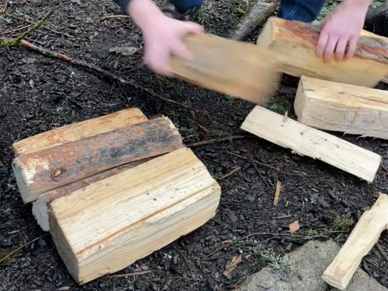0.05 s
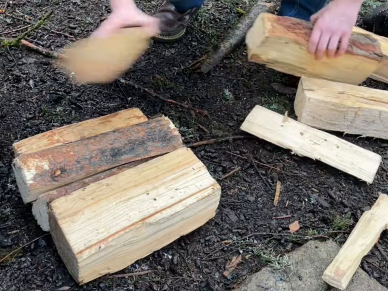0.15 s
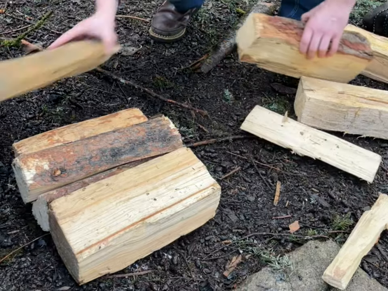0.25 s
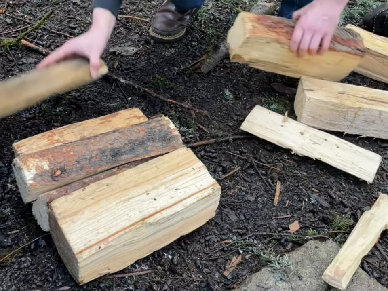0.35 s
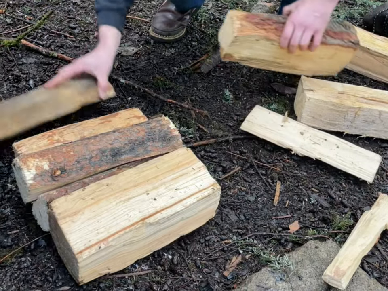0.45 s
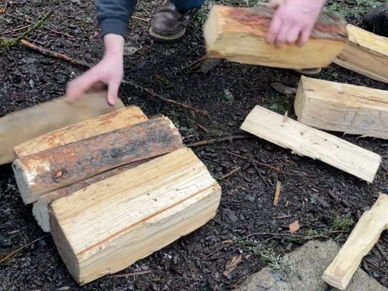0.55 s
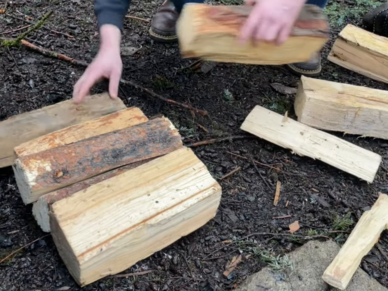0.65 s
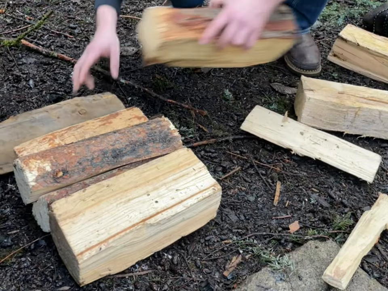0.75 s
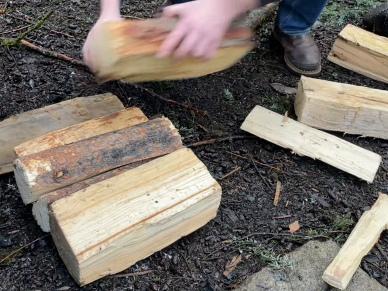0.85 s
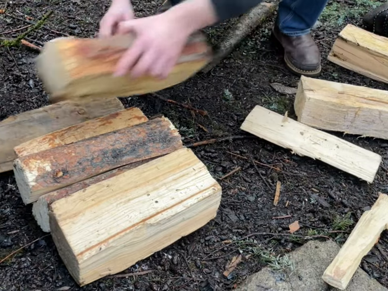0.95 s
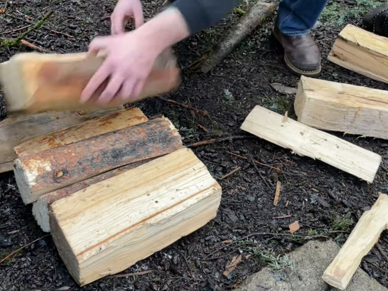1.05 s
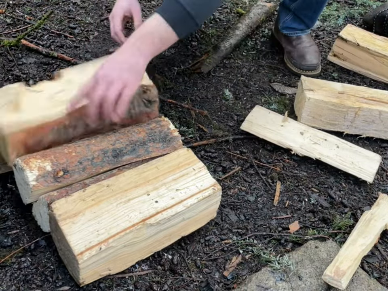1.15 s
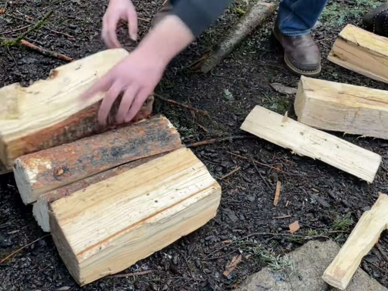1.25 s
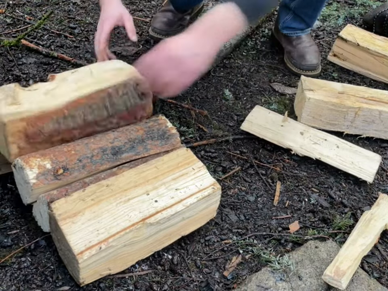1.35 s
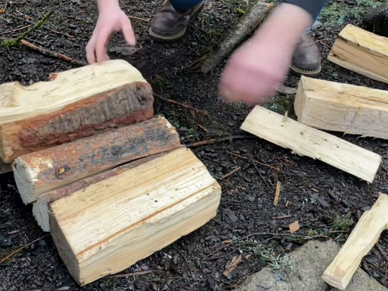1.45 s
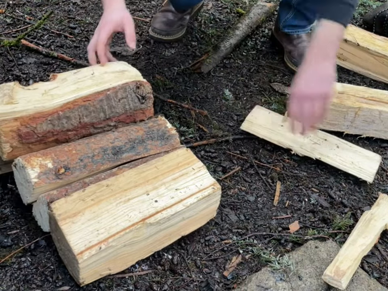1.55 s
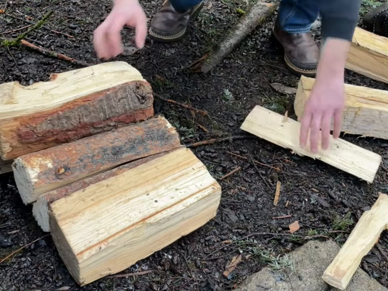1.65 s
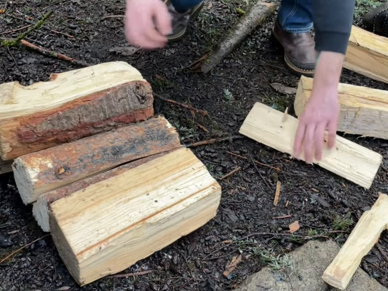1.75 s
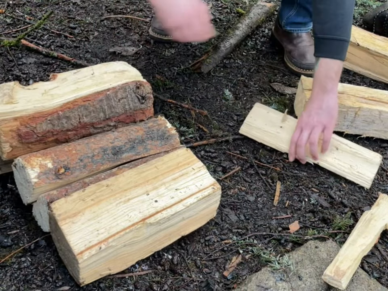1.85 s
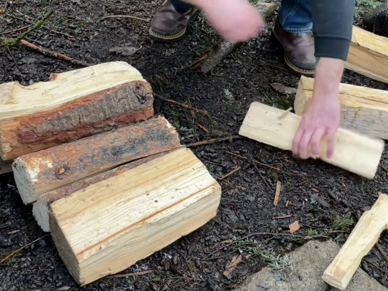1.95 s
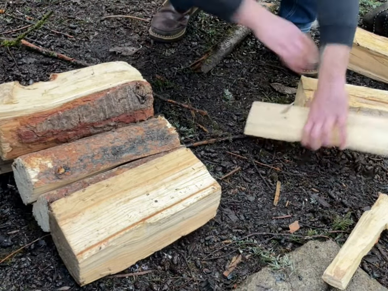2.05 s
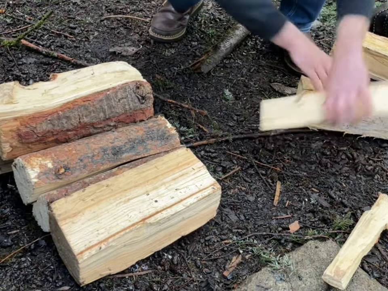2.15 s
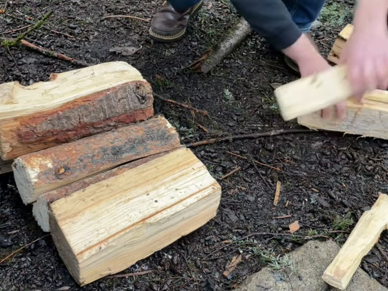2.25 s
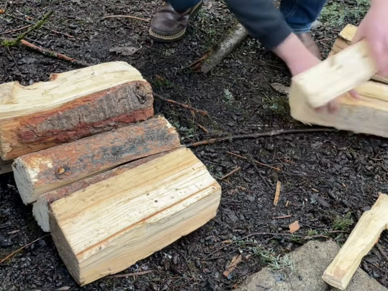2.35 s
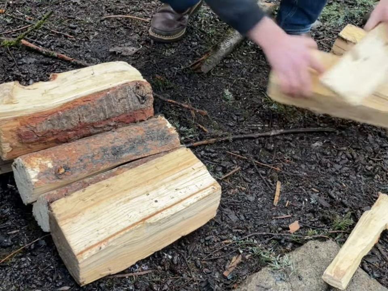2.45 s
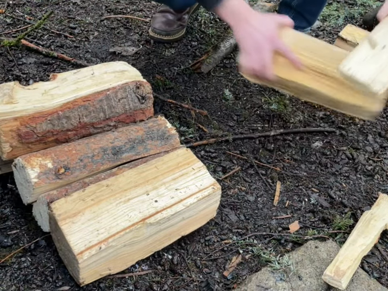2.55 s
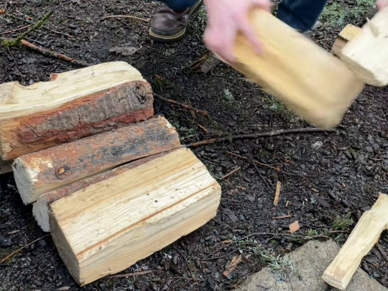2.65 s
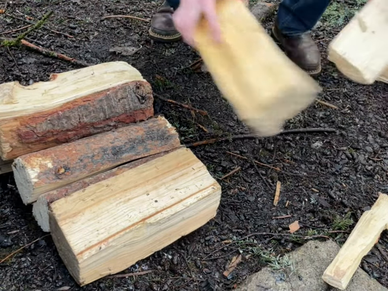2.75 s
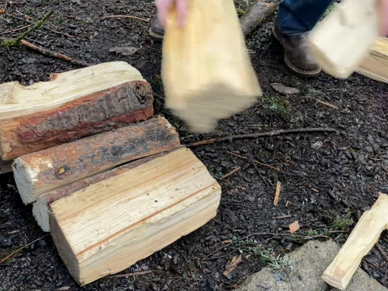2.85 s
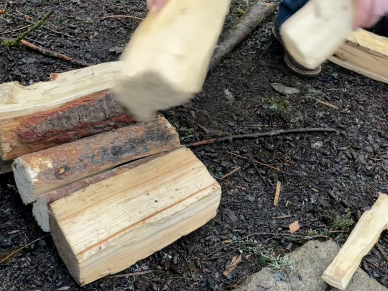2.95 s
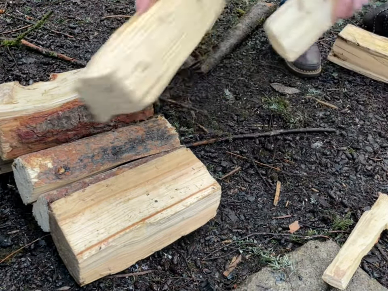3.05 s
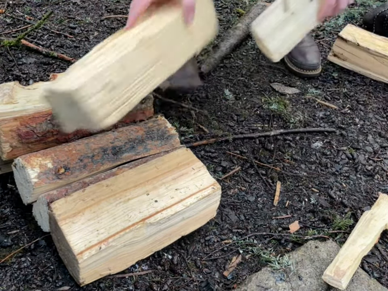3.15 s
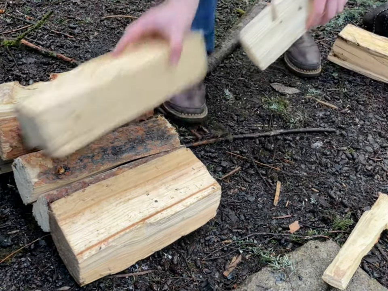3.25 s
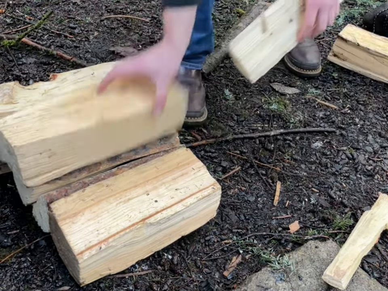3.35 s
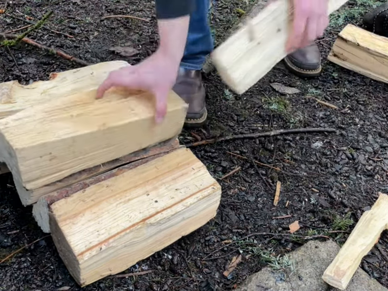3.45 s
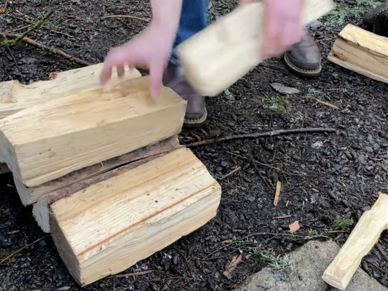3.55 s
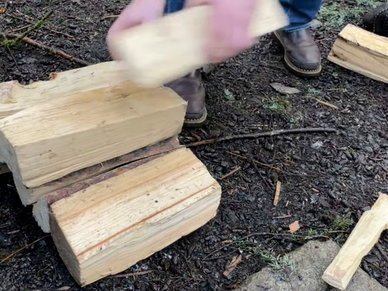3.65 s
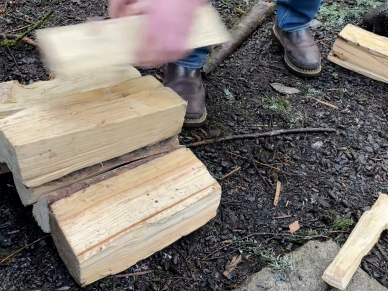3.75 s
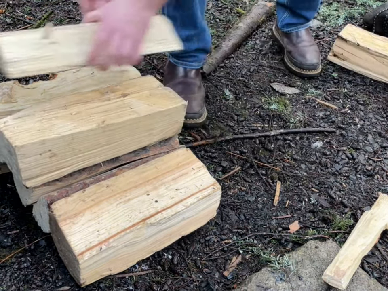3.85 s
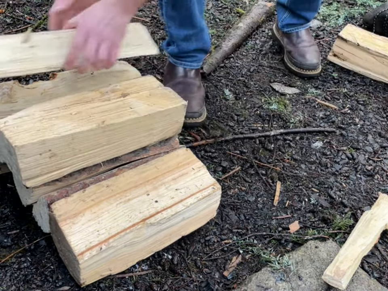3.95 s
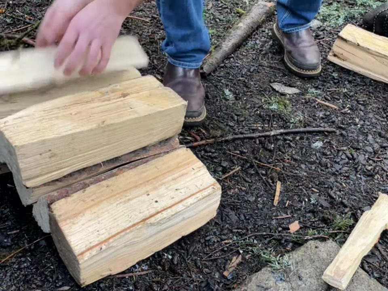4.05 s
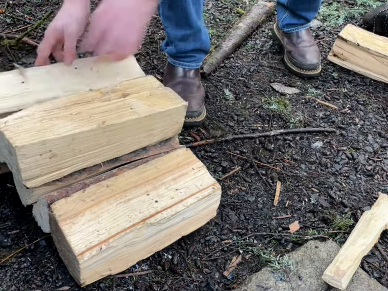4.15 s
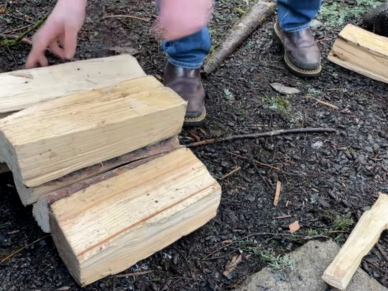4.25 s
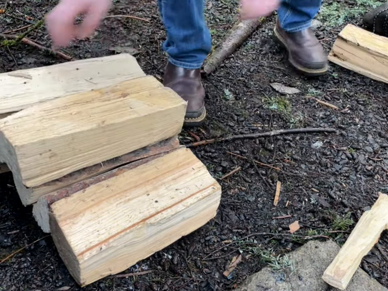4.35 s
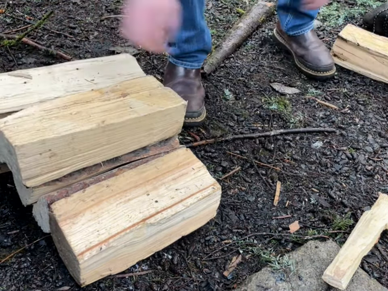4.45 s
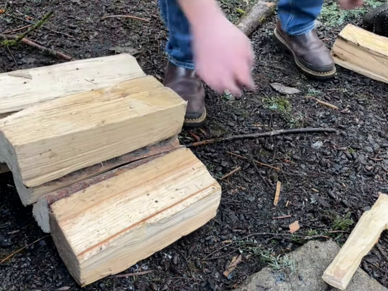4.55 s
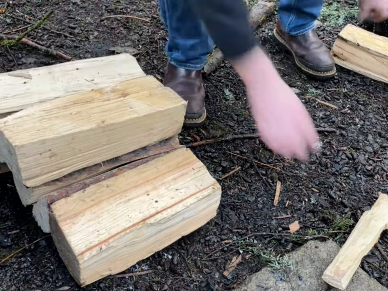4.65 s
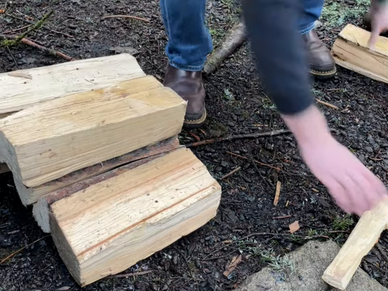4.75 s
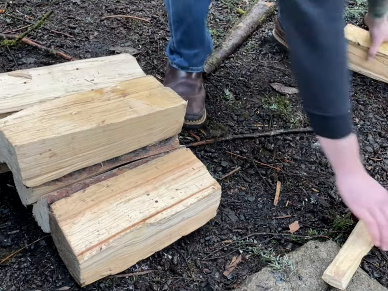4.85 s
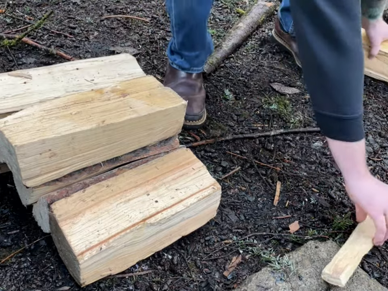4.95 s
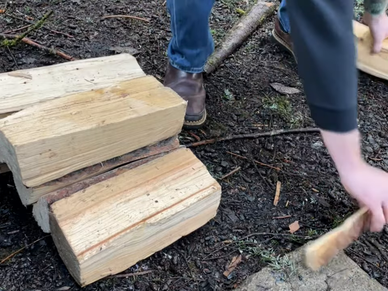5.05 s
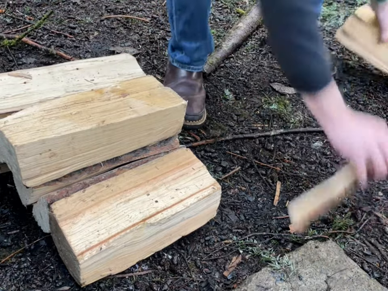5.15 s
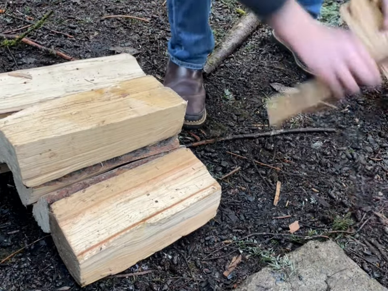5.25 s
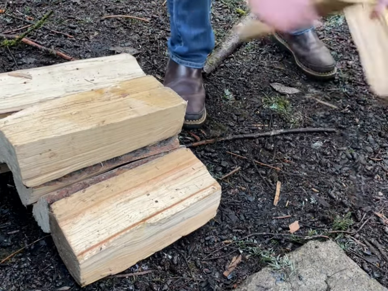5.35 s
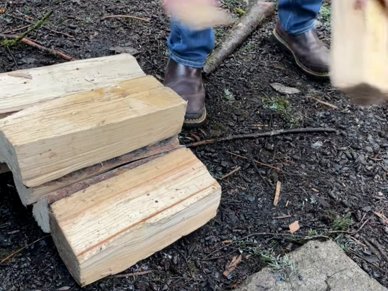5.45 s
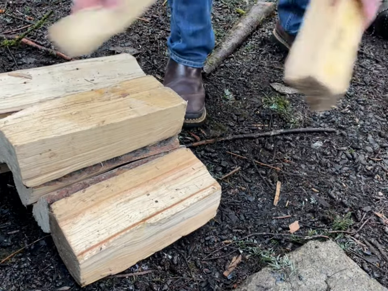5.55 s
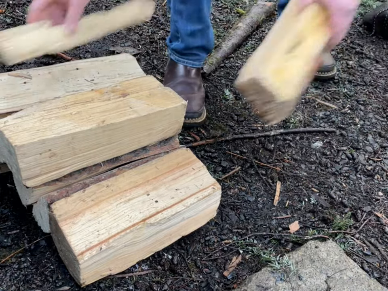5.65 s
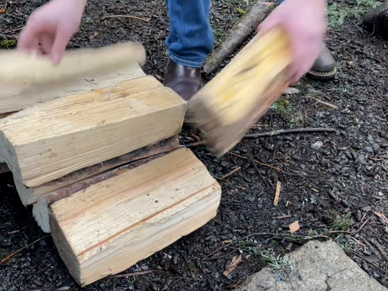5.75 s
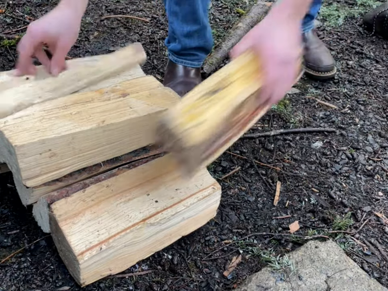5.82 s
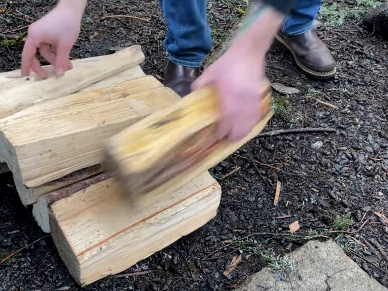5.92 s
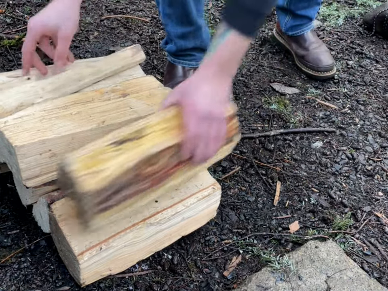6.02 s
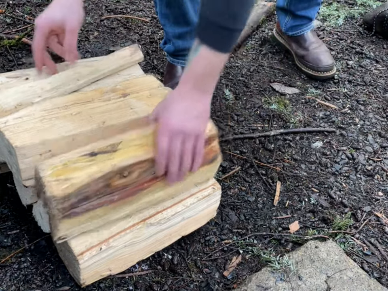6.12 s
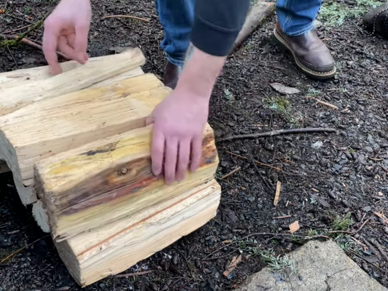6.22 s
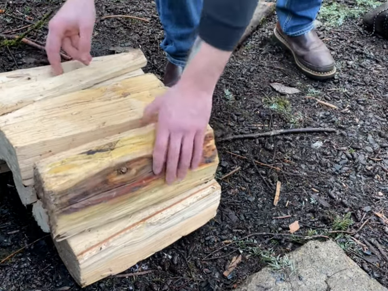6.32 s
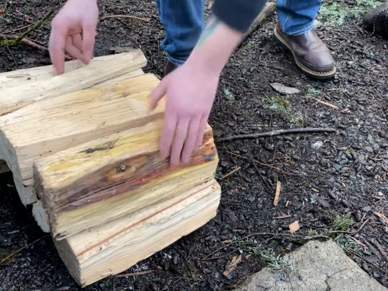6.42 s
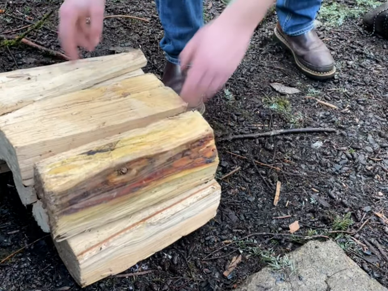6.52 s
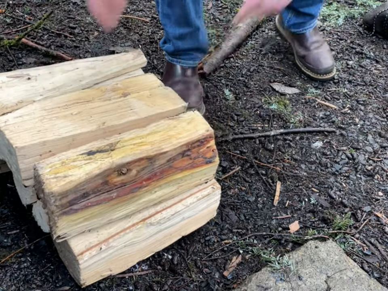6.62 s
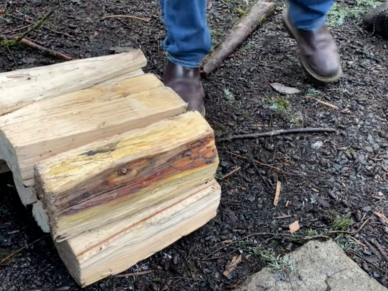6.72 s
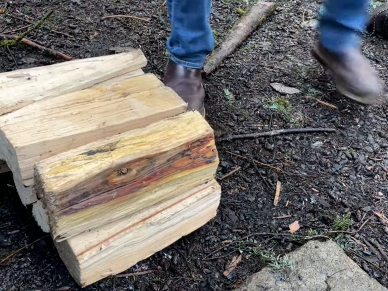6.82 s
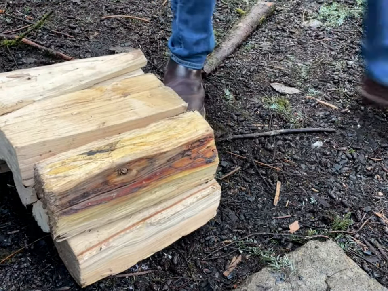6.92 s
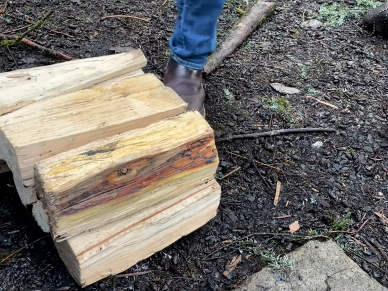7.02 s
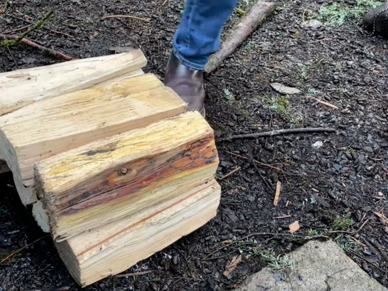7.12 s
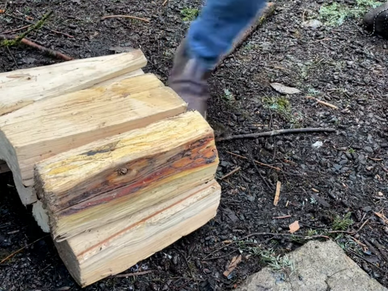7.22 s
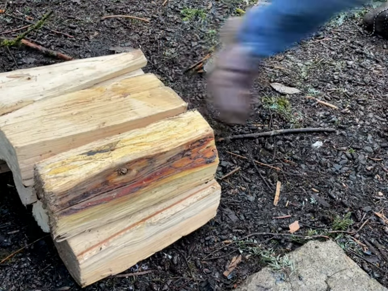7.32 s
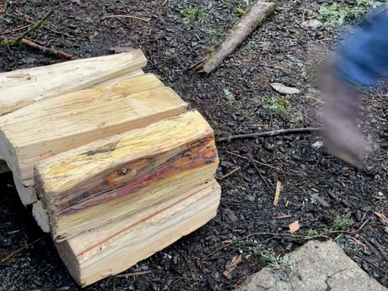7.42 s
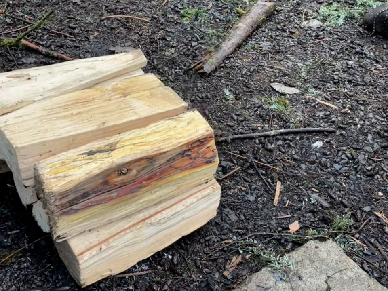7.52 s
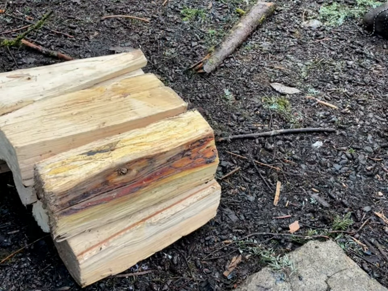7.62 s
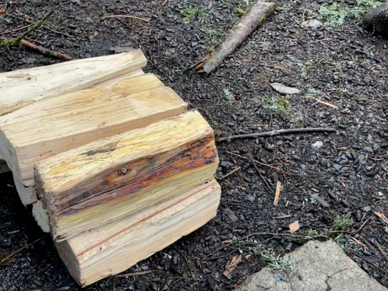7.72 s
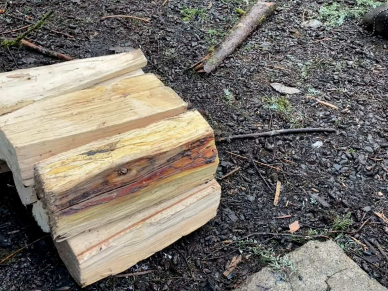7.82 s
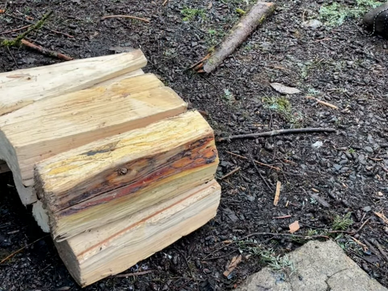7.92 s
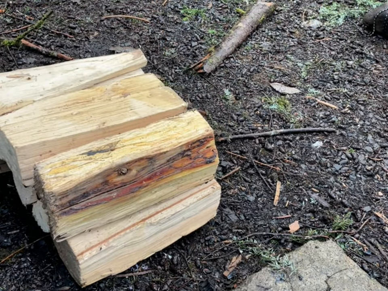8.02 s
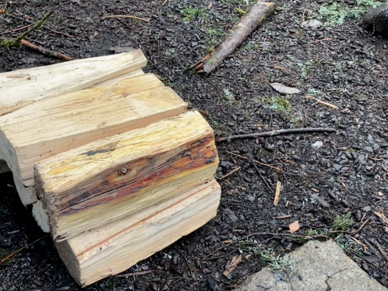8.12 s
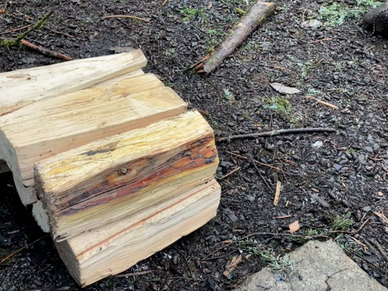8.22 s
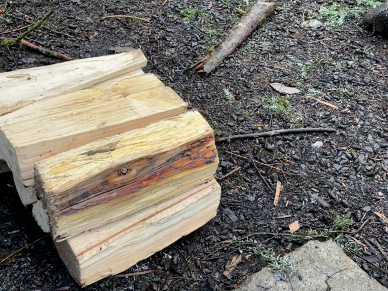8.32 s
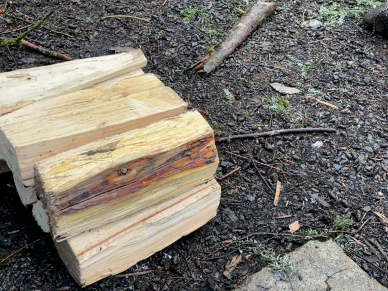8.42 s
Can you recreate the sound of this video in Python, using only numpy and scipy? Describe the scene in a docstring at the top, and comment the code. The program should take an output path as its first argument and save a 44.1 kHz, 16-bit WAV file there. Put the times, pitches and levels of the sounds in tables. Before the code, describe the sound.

Firewood is piled at an outdoor campsite: short, damped wooden knocks, each piece rocking as it lands, some bright and hard, others duller. Tiny twig ticks, rubs and litter rustles fill the gaps. Stacking ends, then faint heel thumps and crisp crackles move off. Near, dry, mono sound with little echo and soft steady air.

```python
"""Stacking split firewood in a forest

At a campsite, close to the microphone, split logs are stacked on damp soil. Each piece lands on edge and
face: damped wood modes ring, noise cracks, two low pile modes thud. Showers of clicks are crushed bark
and litter. Noise ticks are twigs, low damped tones are boot heels midway and near the end, and narrow
noise swells are rubs. Behind lie a faint scattered tail and a soft, even outdoor rush with a low drone."""
import sys
import numpy as np
from scipy import signal
from scipy.fft import rfft, irfft
from scipy.io import wavfile

SR = 44100
rng = np.random.default_rng(int(sys.argv[2]) if len(sys.argv) > 2 else 0)


def inscribe(sig):
    """Save sig as 16-bit PCM at rate SR to the path in sys.argv[1].

    A 1-D sig is mono; a 2-D sig holds one channel per row.
    Samples are clipped to [-1, 1] before scaling.
    """
    pcm = np.round(np.clip(np.atleast_2d(sig).T, -1, 1) * 32767)
    wavfile.write(sys.argv[1], SR, pcm.astype(np.int16))


N = 374004
BLOW = SR // 3   # samples given to one event
AGE = np.arange(BLOW) / SR   # s since the start of an event

# soft blows of heels on the soil: (t/s, level/dB, f/Hz)
FOOTFALLS = [(3.224, -14, 122), (7.667, -21, 145), (8.166, -22, 121)]
# a hand drags a piece, or a sole rolls over the litter: (middle t/s, half length/s, level/dB, centre f/Hz)
RUSTLES = [(0.188, 0.019, -46.5, 8600), (0.413, .025, -42, 7600), (0.524, .013, -36, 4020),
           (1.063, 0.015, -42, 4220), (1.346, .01, -37.5, 4400), (2.341, 0.028, -48, 6800),
           (3.191, 0.014, -46, 4500), (3.704, 0.016, -53, 9900), (5.001, 0.024, -47.5, 9000),
           (5.781, 0.0045, -38, 4500), (6.062, .018, -47.5, 6000), (6.426, 0.025, -46.5, 6050),
           (7.058, 0.023, -48.5, 8500), (7.155, .05, -47, 2800), (7.721, 0.067, -45.5, 4900),
           (8.299, .06, -43, 5800)]
TICK_T60 = 0.0076   # s, of a snapping twig and of a crumb of litter


def from_db(db):
    """Decibels to gain."""
    return 10 ** (np.asarray(db) / 20)


def rms_one(x):
    """Scale to unit rms."""
    return x / np.sqrt(np.mean(x ** 2) + 1e-20)


def add(track, s, sound):
    """Mix a sound into the track from time s."""
    start = max(round(s * SR), 0)
    track[start:start + len(sound)] += sound[:N - start]


def fade(t60):
    """Exponential decay, down 60 dB after t60 seconds."""
    return np.exp(-np.log(1000) * AGE / t60)


def ring(hz, t60, build_cycles=0.24):
    """One damped mode; it needs part of a cycle to build up, so lows arrive later."""
    build_up = 1 - np.exp(-AGE * hz / build_cycles)
    return np.sin(2 * np.pi * hz * AGE) * fade(t60) * build_up


def soften(x, hz):
    """Two one-pole low-passes: a soft contact spreads the force in time."""
    r = np.exp(-2 * np.pi * hz / SR)
    return signal.lfilter([(1 - r) ** 2], [1, -2 * r, r * r], x + 1e-18)


def band(x, hz, width_hz):
    """A resonance around hz, at unit rms."""
    low = np.sqrt(hz ** 2 + width_hz ** 2 / 4) - width_hz / 2
    high = min(low + width_hz, .45 * SR)
    return rms_one(signal.sosfilt(signal.butter(2, [low, high], "band", fs=SR, output="sos"), x))


def coloured(spectrum, size):
    """Noise with the given spectrum, at unit rms."""
    hz, db = np.transpose(spectrum)
    bins = np.arange(size // 2 + 1) * SR / size
    gain = from_db(np.interp(np.log(bins + 1e-9), np.log(hz), db))
    return rms_one(irfft(rfft(rng.standard_normal(size)) * gain, size))


def swell(half_length):
    """A bell-shaped push that peaks two half lengths after its start."""
    return np.exp(-(AGE / half_length - 2) ** 2)


def knocks(thud_lag=0.0021, face_hardness_hz=1250):
    """Wood on wood: edge and face strike a moment apart, each rings and cracks; the weight shoves the pile."""
    # bending modes of each piece of wood, by name: (f/Hz, level/dB, t60/s while it rings freely)
    log_modes = { "grey": [(550, -13, 0.045), (1142, -9, 0.015), (1542, -1.5, 0.023), (1618, -2.5, 0.038),
                 (1770, -11, 0.028), (2060, -0.5, 0.014), (2242, -22, 0.031), (2620, -2.5, 0.015),
                 (2880, -4, 0.0095), (3015, -10, 0.023), (3240, -18, 0.025), (3600, -9, 0.013),
                 (3790, -18, 0.023), (4100, -7.5, 0.008), (4098, -30, 0.028), (4577, -20, 0.012)],
                 "bottom": [(490, 3.5, 0.014), (540, -3, 0.045), (677, -1, 0.041), (854, -8, 0.021),
                 (1033, -9, 0.072), (1130, -9, 0.05), (1500, -7, 0.027), (1727, -7, 0.03),
                 (1810, -8, 0.042), (2240, -6, 0.028), (2330, -9, 0.028), (2757, -10, 0.023),
                 (2810, -7, 0.03), (2800, -1, 0.02), (3000, -12, 0.023), (3100, -1.5, 0.0096)],
                 "barked": [(210.5, -11.5, 0.17), (348, -9, 0.057), (509, 3.5, 0.022), (577, 4, 0.025),
                 (790, -13.5, 0.065), (904, -8, 0.047), (1026, -14.5, 0.11), (1216, -4.5, 0.022),
                 (1342, -11, 0.035), (1530, -25, 0.21), (1711, -11.5, 0.017), (1990, -23, 0.081),
                 (2200, -17.5, 0.035), (2430, -25, 0.025), (2324, -14, 0.027), (2600, -16, 0.013)],
                 "thick": [(279, -19, 0.06), (448, -16, 0.081), (674, -15, 0.091), (737, -25, 0.05),
                 (895, -7, 0.018), (1162, -15, 0.042), (1298, -2, 0.032), (1530, 5, 0.0041),
                 (1634, -7.5, 0.026), (2280, -18, 0.037), (2540, -14.5, 0.025), (3200, -9, 0.0069),
                 (3170, -6, 0.018), (3680, -13, 0.023), (4115, -30, 0.026), (4020, 0.5, 0.0059),
                 (6220, -11.5, 0.016)], "slat": [(570, -22, 0.013), (756, -22, 0.022), (1750, -5.5, 0.016),
                 (1990, -13, 0.03), (1360, -4, 0.0087), (2400, 3, 0.013), (2610, -4, 0.019),
                 (2620, -9, 0.017), (2730, -11, 0.025), (3140, -4, 0.015), (3312, -22.5, 0.03),
                 (3400, -10, 0.023), (3640, -7, 0.016), (4207, -13, 0.026), (4370, -10, 0.032),
                 (4477, 1.5, 0.0043), (6600, -5, 0.0089)], "stick": [(335, -16, 0.05), (525, -8, 0.045),
                 (660, -20, 0.056), (703, -14, 0.12), (918, -7.5, 0.082), (1020, -18, 0.036),
                 (1210, -18, 0.025), (1260, -21, 0.051), (1340, -15, 0.012), (1800, -5.5, 0.025),
                 (1840, -17, 0.026), (2600, 3.5, 0.018), (2610, -2, 0.043), (2870, -6, 0.017),
                 (3130, -6.5, 0.031), (3400, -7, 0.016)], "knotty": [(323, -9, 0.012), (380.5, -14.5, 0.12),
                 (476, -9, 0.043), (565, 0, 0.025), (787, -6.5, 0.037), (984, -18, 0.092),
                 (1125, -16, 0.063), (1557, -3, 0.035), (1530, -0.5, 0.009), (1876, -21, 0.047),
                 (2120, -26, 0.038), (2040, -17, 0.027), (3060, -5.5, 0.0044), (3200, -23, 0.033),
                 (3470, -15, 0.023), (4000, -34, 0.053)], "rear": [(286, -15.5, 0.041), (474, -13.5, 0.047),
                 (616, -3, 0.015), (723, -0.5, 0.024), (910, -10.5, 0.031), (1030, -16, .03),
                 (1340, -10, .025), (2400, -12, .012)], }
    # a piece rocks as it lands: (t/s, piece that rings, edge force level/dB, edge hardness f/Hz,
    # face force level/dB, face lag/s (negative: face first), thud level/dB)
    contacts = [ (0.5, "grey", -1.5, 16800, -17, -0.0017, -48),
                (0.5546, "bottom", -23.5, 6500, -31, -0.0028, -42),
                (0.5635, "bottom", -12.5, 14000, -29, 0.015, -27),
                (1.0938, "barked", -22.5, 5200, -35, 0.0017, -21),
                (1.1447, "barked", -7, 5200, -6.5, -.0029, -20),
                (1.2016, "barked", -25, 500, -49, 0.0014, -22),
                (1.318, "barked", -26, 800, -40, -0.0062, -30),
                (3.314, "thick", -25, 6700, -12.5, 0.0059, -22),
                (3.3642, "thick", -6.5, 20000, 5.5, .0034, -30),
                (3.373, "thick", -7.5, 1300, -13, .0027, -20), (4.0862, "rear", -8, 4400, -27, 0.013, -17),
                (4.1142, "slat", -10.5, 18000, -28, 0.0011, -39),
                (4.1334, "rear", -21.5, 4200, -24, .0004, -27),
                (4.148, "slat", -21.5, 3800, -27, 0.012, -43),
                (5.7673, "stick", -21, 10000, -36, 0.018, -35),
                (5.8036, "thick", -8.5, 870, -27, -0.0033, -29),
                (5.817, "stick", -13.5, 2100, -20, 0.011, -27),
                (6.1161, "knotty", -18, 16000, -21, .004, -28),
                (6.1263, "knotty", 0.5, 1650, -20, 0.00021, -39),
                (6.133, "knotty", -1.5, 4100, -28, 0.01, -20),
                (6.1554, "knotty", -23, 1900, -34, 0.0093, -26), ]
    out = np.zeros(N)
    bodies = {name: log_body(modes) for name, modes in log_modes.items()}
    # the two low modes of the pile on the soil
    pile_low_hz, pile_high_hz, pile_t60 = 119, 252, 0.021
    thud = ring(pile_low_hz, pile_t60) - ring(pile_high_hz, pile_t60)
    for s, name, edge_db, edge_hz, face_db, face_lag, thud_db in contacts:
        edge = (s, edge_db, edge_hz)
        face = (s + face_lag, face_db, face_hardness_hz)
        for at, force_db, hardness_hz in (edge, face):
            add(out, at, from_db(force_db) * soften(bodies[name], hardness_hz))
            add(out, at, from_db(crack_level(force_db, hardness_hz)) * crack())
        add(out, s + thud_lag, from_db(thud_db) * thud)
    return out


def log_body(modes, settle_s=0.014, settled_db=-4.0):
    """A log rings freely for a moment, then presses into the pile, which mutes it."""
    free = np.zeros(BLOW)
    for k, (hz, db, t60) in enumerate(modes):
        sign = (-1) ** k
        free += sign * from_db(db) * ring(hz, t60)
    settled = 1 - np.exp(-(AGE / settle_s) ** 4)
    return free * from_db(settled_db * settled)


def crack(rise_s=0.00052, dull_hz=5000, bright_t60=0.0093, dull_t60=0.034):
    """The dense high modes of split wood, as noise: the brightest of them die first."""
    # the many high wood modes of a crack: (f/Hz, level/dB per Hz)
    crack_spectrum = [(500, 0), (1500, 0.5), (3300, 0), (5000, -4.5), (6500, -5), (9000, -7),
                      (13000, -14.5), (16000, -19)]
    modes = coloured(crack_spectrum, BLOW)
    dull = soften(modes, dull_hz)
    return (modes * fade(bright_t60) + dull * fade(dull_t60)) * (1 - np.exp(-AGE / rise_s))


def crack_level(force_db, hardness_hz, full_force_db=-21.5, reference_hz=3000,
                db_per_force_db=0.47, db_per_octave=3.5):
    """The crack grows with the force and the hardness of a contact."""
    return full_force_db + db_per_force_db * force_db + db_per_octave * np.log2(hardness_hz / reference_hz)


def crunches(per_s=550, spread_db=4.0, width=0.52, finest_hz=11000):
    """Fibres give way as a shower of tiny clicks, in bands pitched by the size of the splinters."""
    # the sizes of splinters, as pitches: (multiple of the centre f, level/dB)
    splinters = [(.25, -4.5), (.4, -4.5), (.63, -2), (1, -1.5), (1.6, -8.5), (2.5, -7.5)]
    out = np.zeros(N)
    for s, half_length, db, hz in crushings():
        grains = np.zeros(BLOW)
        for multiple, grit_db in splinters:
            sizes = from_db(spread_db * np.minimum(rng.exponential(1, BLOW), 4))
            signed_sizes = sizes * rng.choice([-1, 1], BLOW)
            clicks = signed_sizes * (rng.random(BLOW) < per_s / SR)
            pitch = min(multiple * hz, finest_hz)
            grains += from_db(grit_db) * band(clicks + 1e-18, pitch, width * pitch)
        add(out, s - 2 * half_length, from_db(db) * swell(half_length) * rms_one(grains))
    return out


def crushings():
    """Rustles, landings and heels all crush fibres: (middle t/s, half length/s, level/dB, centre f/Hz)."""
    # a piece lays its weight on the pile: (t/s, crushed bark level/dB, settling litter level/dB)
    landings = [(.563, -35.5, -43.5), (1.145, -34, -43), (3.363, -33.5, -59), (4.134, -41, -51),
                (5.826, -33.5, -52), (6.134, -26.5, -48)]
    # bark is crushed just before the weight arrives; the litter under the pile settles after it
    crush_lead_s, crush_half_s, crush_hz = .011, .009, 4800
    settle_lag_s, settle_half_s, settle_hz = .051, .019, 5800
    # a heel crushes the litter just before it thumps the soil; the level is relative to the thump
    heel_lead_s, heel_half_s, heel_crunch_db, heel_crunch_hz = .004, 0.0071, -21, 4520
    bark = [(s - crush_lead_s, crush_half_s, db, crush_hz) for s, db, _ in landings]
    settling = [(s + settle_lag_s, settle_half_s, db, settle_hz) for s, _, db in landings]
    heels = [(s - heel_lead_s, heel_half_s, db + heel_crunch_db, heel_crunch_hz) for s, db, _ in FOOTFALLS]
    return RUSTLES + bark + settling + heels


def snaps(width_hz=6000):
    """A thin twig or fibre breaks with one bright tick of fading noise."""
    # the loudest twigs and fibres snapping: (t/s, level/dB, centre f/Hz)
    breaks = [(.345, -41, 12000), (.602, -33, 4970), (1.2503, -29, 13500), (1.3418, -20, 4200),
              (1.4692, -38.5, 11000), (2.0955, -39.5, 10000), (3.8843, -38, 7000), (3.954, -33, 4550),
              (4.4655, -35, 3500), (5.009, -39, 9000), (5.2077, -39, 11000), (7.0305, -34, 12000),
              (7.6589, -33.5, 6500), (7.694, -29, 5000), (7.928, -26, 12300), (7.942, -23, 7550),
              (8.312, -26.5, 6500)]
    out = np.zeros(N)
    for s, db, hz in breaks:
        noise = band(rng.standard_normal(BLOW), hz, width_hz)
        add(out, s, from_db(db) * fade(TICK_T60) * noise)
    return out


def footwork(heel_hz=260, heel_t60=0.037, rub_width=0.45):
    """Heels thump the soft ground; gripping surfaces slip with a brief narrow rasp."""
    # short rubs of soles and hands: (middle t/s, half length/s, level/dB, centre f/Hz)
    slips = [(0.18, 0.0087, -46, 9000), (0.687, .012, -41.5, 760), (3.21, 0.015, -34, 460),
             (4.015, .018, -48, 7900), (6.432, .012, -37.5, 1630), (7.126, 0.0076, -41, 1700),
             (7.201, .004, -34.5, 1320), (7.22, 0.0029, -34.5, 1430), (8.159, .009, -35.5, 510)]
    out = np.zeros(N)
    for s, db, hz in FOOTFALLS:
        add(out, s, from_db(db) * soften(ring(hz, heel_t60), heel_hz))
    for s, half_length, db, hz in slips:
        rasp = band(rng.standard_normal(BLOW), hz, rub_width * hz)
        add(out, s - 2 * half_length, from_db(db) * swell(half_length) * rasp)
    return out


def litter(per_s=6, pressed_per_s=35, level_db=-35, pressed_db=6, spread_db=3.5, low_hz=4500):
    """Stray needles and crumbs tick all the while, more often and louder where they are pressed."""
    pressed = pressure()
    breaks = rng.random(N) < (per_s + pressed_per_s * pressed) / SR
    spread = spread_db * np.minimum(rng.exponential(1, N), 3)
    sizes = from_db(pressed_db * pressed + spread) * breaks
    tick = rng.standard_normal(BLOW) * fade(TICK_T60)
    ticks = signal.fftconvolve(sizes, tick / np.linalg.norm(tick))[:N]
    return from_db(level_db) * signal.sosfilt(signal.butter(2, low_hz, "high", fs=SR, output="sos"), ticks)


def pressure():
    """How hard the litter is pressed, 0-1: it swells with every rustle."""
    out = np.zeros(N)
    for s, half_length, _, _ in RUSTLES:
        add(out, s - 2 * half_length, swell(half_length))
    return np.minimum(out, 1)


def scatter(x, level_db=-24, t60=0.11, cut_hz=4900, build_s=0.0056):
    """Ground, pile and trunks send back a faint, dull tail."""
    noise = soften(rng.standard_normal(BLOW), cut_hz)
    tail = noise * fade(t60) * (1 - np.exp(-AGE / build_s))
    return from_db(level_db) * signal.fftconvolve(x, tail / np.linalg.norm(tail))[:N]


def forest(air_db=-44.5, drone_hz=70.9, drone_width_hz=3.9, drone_db=-58.5):
    """An even far rush of shaped noise, with a low drone of narrow noise under it."""
    # the air of the forest: (f/Hz, level/dB per Hz)
    air_spectrum = [(53, -49), (90, -1.5), (145, 2), (188, -3), (255, -0.5), (284, -0.5), (316, 0),
                    (581, -1.5), (839, 0), (1320, -1.5), (5070, -13.5), (8000, -20), (13500, -30),
                    (16000, -38)]
    # the first second, where the narrow filter builds up, is dropped
    drone = band(rng.standard_normal(N + SR), drone_hz, drone_width_hz)[SR:]
    return from_db(air_db) * coloured(air_spectrum, N) + from_db(drone_db) * drone


def scene():
    """Stacking and steps in the open air, in mono."""
    near = knocks() + crunches() + snaps() + footwork()
    return (near + scatter(near) + forest() + litter())[None]


def record(dry, low_cut_hz=54, top=1.4, cutoff_hz=16000):
    """The microphone drops the deep bass and rounds the loudest peaks; the top is cut."""
    thin = signal.sosfilt(signal.butter(6, low_cut_hz, "high", fs=SR, output="sos"), dry)
    rounded = top * np.tanh(thin / top)
    return signal.sosfilt(signal.ellip(10, .1, 80, cutoff_hz, fs=SR, output="sos"), rounded)


dry = scene()
out = record(dry)
inscribe(out)
```